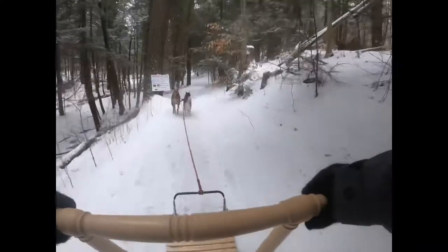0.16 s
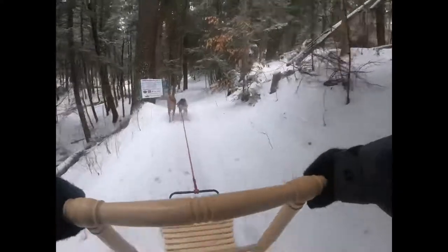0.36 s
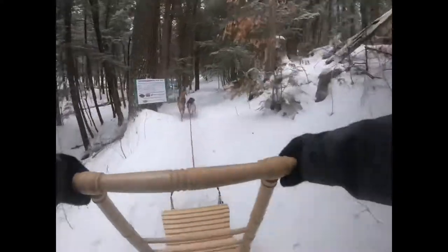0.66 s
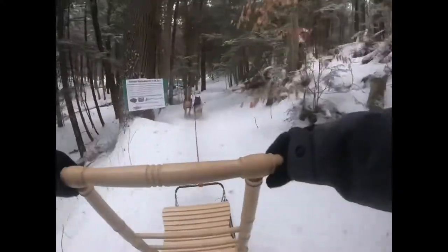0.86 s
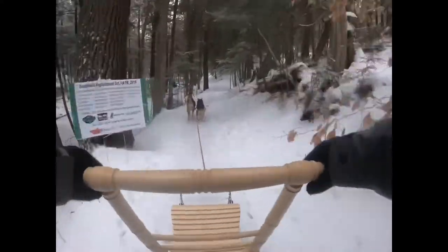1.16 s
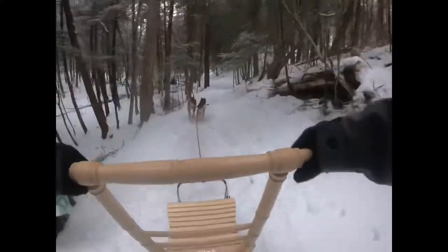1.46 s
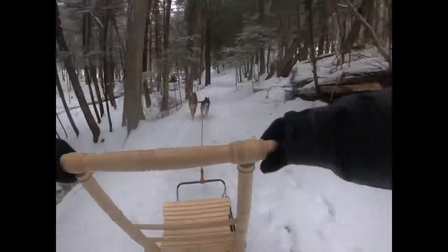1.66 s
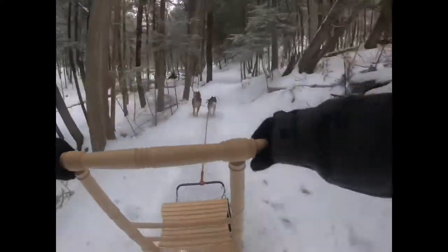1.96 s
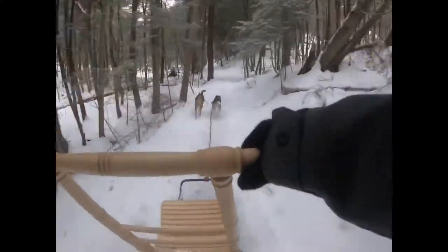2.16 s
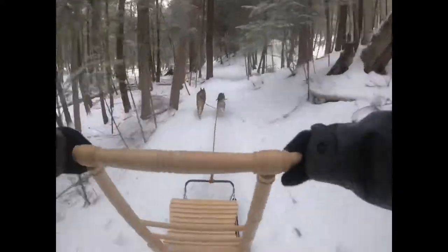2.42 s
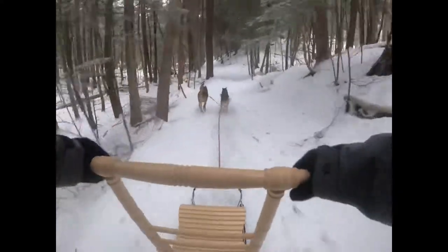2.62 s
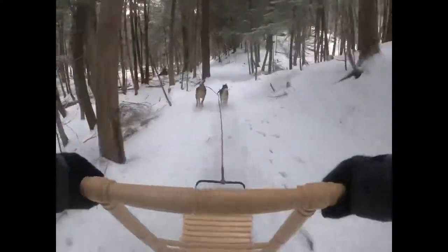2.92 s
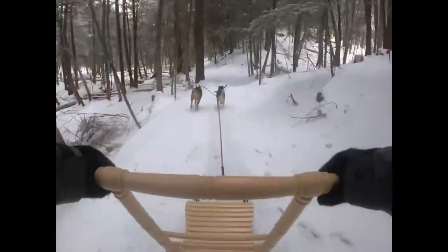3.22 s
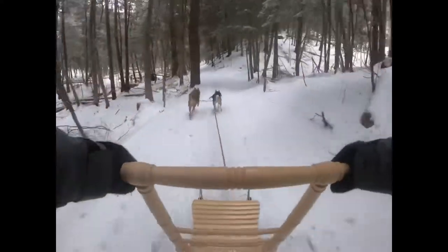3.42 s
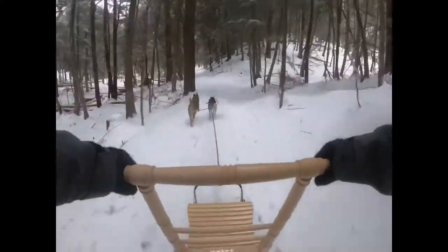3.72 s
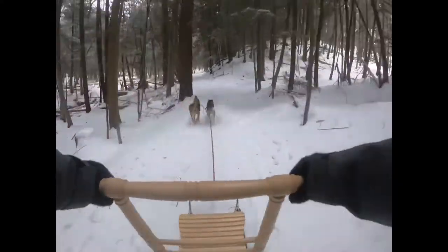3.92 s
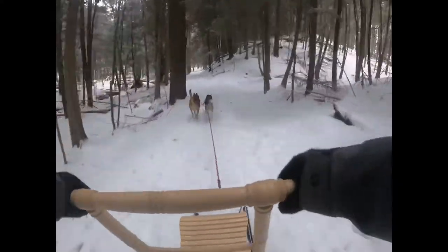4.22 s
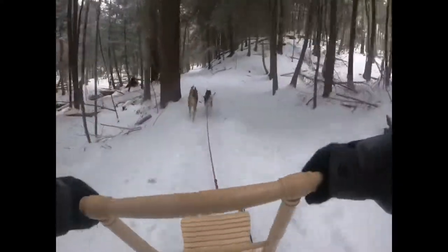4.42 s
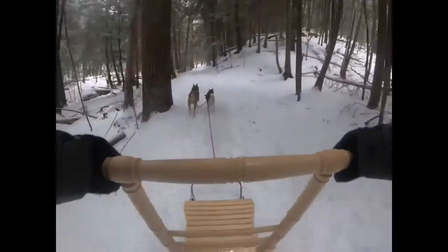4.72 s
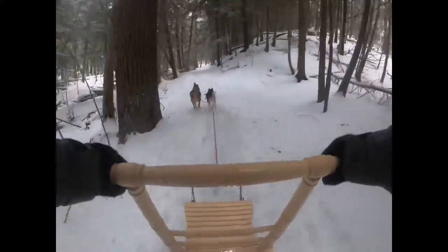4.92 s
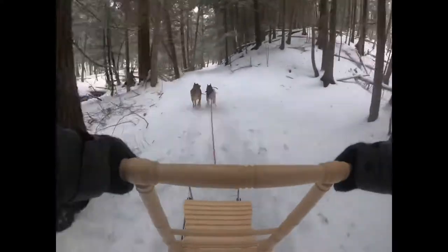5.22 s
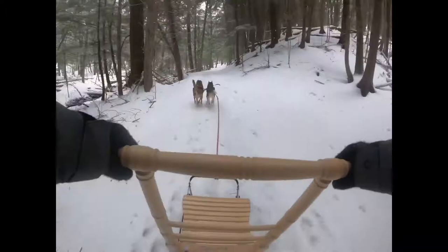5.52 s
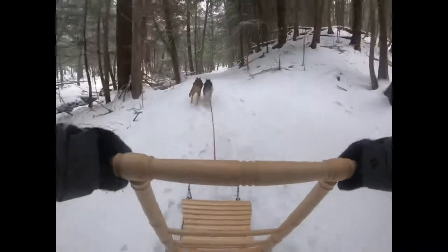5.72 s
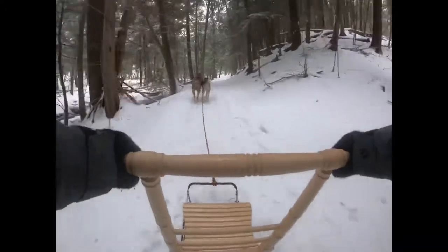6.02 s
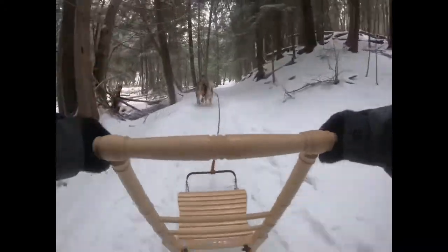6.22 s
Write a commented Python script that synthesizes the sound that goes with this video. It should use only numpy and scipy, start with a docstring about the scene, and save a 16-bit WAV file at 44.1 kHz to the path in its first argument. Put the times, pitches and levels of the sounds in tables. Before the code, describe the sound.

A wooden dog sled slides along a snowy forest trail, heard from a small covered camera on the driver's chest. Runners scrape steadily but unevenly, breaking crust into short, gritty, mid-pitched crunches with a thin hiss of ice grains. Faint frame drone and soft wind rumble sit below. Crunching thickens after two seconds and peaks near three; a sharp knock comes at about five, and more heavy crunches close it.

```python
"""Sled on crusty snow

Sled runners slide over crusty snow, heard by a small camera on the driver's chest.
Breaking snow grains, made from noise and clicks, scrape and crunch; they ring the camera housing's modes.
Filtered noise adds a fine hiss above, and below it the drone of the wooden frame and the rumble of wind.
Jolts are single low pulses; knocks are sharp clicks that ring the housing, each with a puff of noise."""
import sys
import numpy as np
from scipy import signal
from scipy.fft import rfft, irfft
from scipy.io import wavfile
from scipy.ndimage import uniform_filter1d

SR = 44100
rng = np.random.default_rng(int(sys.argv[2]) if len(sys.argv) > 2 else 0)


def master_out(mix):
    """Clip the mix to full scale and print it as 16-bit PCM to the path in sys.argv[1]."""
    frames = np.transpose(np.atleast_2d(mix))
    ceiling = np.clip(frames, -1, 1)
    pcm = np.round(ceiling * 32767).astype(np.int16)
    wavfile.write(sys.argv[1], SR, pcm)


N = 280917
HZ = np.fft.rfftfreq(N, 1 / SR)
TIME = np.arange(N) / SR

# All source levels below are relative: the layers are mixed with further gains.
# pressure of the runners on the crust: t/s, scrape level/dB, treble level/dB, scrape tilt/(dB per octave)
GLIDE = [(0, -35, -46.5, 8), (.2, -37, -52.5, 4.5), (.37, -36.5, -50, 6), (.45, -33, -47, 0),
         (.62, -37, -49, 4), (.74, -31, -44.5, 4), (.95, -41, -51.5, 7), (1.1, -29, -44, -1),
         (1.17, -41, -51, 3), (1.28, -29, -45, 6), (1.42, -37, -51, 2), (1.52, -39.5, -51, -1),
         (1.72, -33.5, -46.5, 1), (1.8, -40, -51, 5), (1.89, -31.5, -42.5, 2), (2.03, -31.5, -44.5, 4),
         (2.17, -35, -47.5, 3.5), (2.5, -32.5, -46.5, 1.5), (2.67, -30.5, -41.5, 8.5), (2.785, -30, -42, 5),
         (2.85, -26, -42.5, 0), (3.1, -33, -45.5, 3.5), (3.72, -38.5, -48, 0.5), (3.8, -34.5, -44.5, 3),
         (4.3, -38, -48.5, 3), (4.42, -33, -44.5, 9.5), (4.68, -36.5, -46, 0.5), (5.05, -33, -42.5, 4),
         (5.2, -27.5, -43.5, 1), (5.3, -31.5, -44, 2.5), (5.42, -31, -40.5, 5.5), (6.0, -31, -42, 3),
         (6.37, -34, -48, 1.5)]
# crust breaking under a runner: t/s, level/dB, length/ms, treble share/dB, colour f/Hz
CRUNCHES = [(0.068, -18, 14.5, -28, 2120), (0.111, -17.5, 19, -29.5, 2250), (0.134, -20, 17, -32, 2500),
            (0.15, -20.5, 16.4, -31, 2180), (0.221, -16.5, 10.4, -33, 2180), (0.42, -16, 9, -27, 2400),
            (0.4272, -5, 10.8, -31, 2540), (0.461, -17, 13, -28, 2450), (0.718, -16, 15, -29, 2480),
            (0.733, -22, 16, -38, 2500), (0.793, -21.5, 16, -28, 2430), (0.893, -24, 42, -28, 2500),
            (0.9325, -9.5, 21, -37, 2480), (1.007, -23.5, 30, -21.5, 2030), (1.182, -20, 24, -41, 2380),
            (1.194, -13.5, 16.7, -31.5, 2370), (1.289, -18.5, 17, -22, 2200), (1.337, -9, 7.5, -36, 2620),
            (1.344, -10, 8.7, -31, 2400), (1.39, -16, 14, -43, 1760), (1.416, -13.5, 10.3, -36, 2150),
            (1.529, -19, 13, -38, 2500), (1.595, -16, 8.6, -41, 2610), (1.8843, -14, 8, -23, 2290),
            (1.915, -18, 12, -23, 2440), (1.957, -10, 22, -27, 2200), (2.055, -21, 22, -32, 2400),
            (2.098, -10.5, 21.3, -37, 2340), (2.134, -1, 5.1, -40, 2400), (2.191, -23, 11, -31, 2900),
            (2.215, -17, 20, -35, 3050), (2.244, -15, 23, -31, 2980), (2.273, -13, 11, -29, 2830),
            (2.34, -20, 17, -40, 2750), (2.36, -19, 45, -26, 2800), (2.39, -22.5, 50, -23, 2520),
            (2.443, -19, 37, -24.5, 2850), (2.49, -14, 11, -37, 2820), (2.537, -12.5, 23.5, -26.5, 2600),
            (2.63, -18, 12.6, -29, 2700), (2.745, -8.5, 9.4, -39, 2360), (2.798, -7, 5, -26, 2300),
            (2.8032, -3.5, 9, -34.5, 2450), (2.823, -9, 17, -28, 2170), (2.881, -8, 15.4, -28.5, 2400),
            (2.8945, -5.5, 8.4, -37, 2410), (2.904, -9.5, 18, -40, 2450), (2.92, -16, 22, -34, 2400),
            (2.9473, -6, 10.5, -39, 2440), (3.027, -22, 8, -23, 2400), (3.116, -12, 10.8, -43, 2370),
            (3.1773, -6.5, 8.3, -36, 2570), (3.195, -11.5, 17, -42, 2420), (3.287, -18, 16, -31, 2700),
            (3.324, -14.5, 12, -28, 2470), (3.339, -14.5, 18.4, -35, 2550), (3.496, -23.5, 9.9, -27, 2260),
            (3.64, -15.5, 8.3, -30, 2420), (3.776, -14, 13, -24.5, 2400), (3.816, -17, 7.9, -37, 2400),
            (3.951, -12.5, 7.5, -25, 2130), (3.958, -1.5, 5.7, -43, 2440), (4.044, -8, 7.4, -37, 2480),
            (4.057, -11, 19.4, -32, 2620), (4.173, -15.5, 10.3, -44, 2180), (4.2416, -17.5, 15, -33, 2270),
            (4.383, -17.5, 23, -25.5, 2420), (4.463, -9.5, 29, -32.5, 2020), (4.52, -4, 9.8, -34, 2270),
            (4.542, -10.5, 10, -48, 2270), (4.577, -13, 14, -40, 2640), (4.597, -7.5, 10, -36, 2150),
            (4.719, -23.5, 30, -23, 2530), (4.812, -13, 7.6, -24, 1970), (4.906, -13.5, 9.1, -35, 2570),
            (4.979, -9.5, 8.1, -36, 2180), (5.091, -13.5, 32, -25.5, 2050), (5.141, -13, 22, -32, 2400),
            (5.176, -9, 11, -32, 2310), (5.199, -12.5, 21, -31, 2400), (5.227, -10.5, 18, -32, 2150),
            (5.307, -16.5, 13, -26, 2600), (5.343, -13, 32, -29.5, 2060), (5.4838, -11, 12.8, -29, 2270),
            (5.6686, -11, 26.5, -31.5, 2170), (5.788, -22, 11, -35, 2420), (5.892, -15, 31, -24, 2490),
            (5.958, -12, 26, -30.5, 2160), (5.995, -18, 5.3, -16, 2260), (6.023, -2.5, 7.2, -33, 2200),
            (6.059, -10, 8.4, -33, 1930), (6.073, -8, 8.8, -34, 2420), (6.089, -17, 19, -30, 2280),
            (6.115, -12, 44, -35, 1960), (6.1755, -17, 13, -29, 2340), (6.1868, -15, 25, -27.5, 1980),
            (6.264, -16, 28, -26, 1900), (6.281, -8, 25.5, -35, 2030), (6.302, -6.5, 10, -33.5, 2200),
            (6.326, -3, 5.4, -40, 2490), (6.349, -17.5, 11, -27.5, 2290), ]
# ringing modes of the camera housing, low, main and high: f/Hz, width/Hz, left level/dB, right level/dB
HOUSING_LOW = [(561, 63, -2.5, -5.5), (639, 620, -8.5, -12), (736, 140, 1.5, 2), (868, 72, 2.5, 3.5),
               (1005, 246, -3, 1), (1199, 96, -4, 5)]
HOUSING = [(1420, 180, -10, -8), (1667, 324, -0.5, 0), (1862, 150, -20, 2), (2245, 580, -3.5, -0.5),
           (2441, 650, -3.5, 1.5), (2744, 414, -9, 1.5), (3060, 650, -9.5, -9.5)]
HOUSING_HIGH = [(3980, 500, -4, -4), (4720, 620, 1.5, 3.5), (5480, 620, .5, .5), (6050, 550, -4.5, -4.5)]
# how far the right port (microphone opening) leads the left: f/Hz, lead/radians
PORT_LEAD = [(555, .6), (740, 2.1), (870, 2.6), (1020, 3.2), (1200, 1.8), (1450, -.1), (1860, -.1),
             (2200, -.2), (2460, .45), (2800, .3), (3250, -.6), (3900, -.8), (4600, -3.0), (5500, -2.5),
             (6050, -3.0)]
# spectrum of the hiss: f/Hz, level per Hz/dB
HISS = [(5200, -28), (6000, 0.5), (6500, 2), (8000, 4.5), (9500, 1.5), (12000, -4.5), (16000, -12)]
# hiss at the two ports: f/Hz, likeness (-1 to 1), left over right/dB
HISS_PORTS = [(6600, -.1, 0), (7700, -.35, -1), (8300, .1, -1), (9100, -.3, 2.5), (10000, -.1, 6),
              (12000, -.05, 1)]
# blows on the housing: t/s, level/dB, centre f/Hz, spread/octaves
KNOCKS = [(2.388, -37, 550, 0.12), (5.2488, -12.5, 1820, 0.98), (5.262, -18, 550, 0.15),
          (5.2628, -16.5, 4800, 1.57), (5.2649, -29, 2180, 1.2), (5.278, -28, 2600, 0.97),
          (5.355, -32.5, 805, 0.74), (6.121, -26, 1100, 0.56)]
# bumps heard as one low pulse: t/s, level/dB, f/Hz
JOLTS = [(.5, -37, 40), (.545, -35, 140), (0.568, -28.5, 55), (0.59, -32, 90), (2.538, -32, 110),
         (2.559, -29.5, 39.7), (2.584, -37, 45), (3.76, -39, 130), (3.893, -35, 60), (3.968, -33, 30),
         (4.051, -44, 144), (5.1183, -20, 141), (5.131, -26.5, 126), (5.253, -29.5, 149), (.445, -36, 149),
         (0.69, -38, 129), (1.418, -34.5, 171)]
# shaking of the sled and headwind: t/s, frame drone level/dB, wind level/dB
BASS = [(0, -57, -39), (.35, -57, -48.5), (.55, -51, -45), (.78, -59.5, -54), (1.18, -63, -52),
        (1.3, -50, -43.5), (1.47, -56, -45), (1.55, -63, -60), (1.68, -54, -47), (1.79, -60.5, -60),
        (1.88, -50.5, -49.5), (2.17, -62.5, -48), (2.55, -51.5, -48), (2.68, -60.5, -47), (3.15, -56, -53),
        (3.57, -66.5, -65), (3.8, -53, -46), (3.95, -56.5, -45), (4.12, -59.5, -46.5), (4.24, -50.5, -41),
        (4.33, -64, -50.5), (4.55, -56, -45), (5.03, -63, -56), (5.12, -53, -44.5), (5.22, -58.5, -44),
        (5.27, -54.5, -50), (5.45, -55.5, -45.5), (5.92, -59, -56), (6.13, -56, -44.5), (6.37, -53, -36)]
# resonances of the wooden frame: f/Hz, width/Hz, level/dB
FRAME = [(163.2, 72, 1), (216, 200, -4), (338, 160, -15)]
# spectrum of the wind: f/Hz, level per Hz/dB
WIND = [(8, -15), (15, 1.5), (30, -9), (50, -17), (70, -21.5), (110, -34.5), (200, -30.5)]
# response of the covered microphones: f/Hz, level/dB
MICROPHONE = [(10, 0.5), (9800, -1), (10500, -7), (11200, -20), (14000, -11), (16000, -23)]

# the low modes follow frame shaking and scrape (dB per dB), around a middle level in dB
LOW_PER_SHAKE, LOW_PER_SCRAPE, LOW_DB = 0.83, 0.066, -53.5
# the tick of a blow: dB over the blow, colour in Hz, decay in ms
TICK_DB, TICK_HZ, TICK_MS = -7, 6000, 2.0
TILT_PIVOT_HZ = 2300  # the scrape tilt leaves this frequency unchanged
EDGE_HZ = 15100  # upper band limit


def runners(bumps):
    """Scrape and crunches ring the housing; lumps in the crust vary the force, most gently in the dust."""
    lumps = wobble(0.043)
    *bursts, burst_treble = crunches()
    snap = cracks(gap_ms=1.6, spread_db=4.5)
    level_db, treble_db, shake_db = curve(GLIDE, 1), curve(GLIDE, 2), curve(BASS, 1)

    force = gain(level_db + 1.2 * lumps + 1.7 * wobble(0.006))
    snaps = snap * np.hypot(gain(-3.5) * np.array(bursts), gain(-9.5) * force)
    tilt_db = curve(GLIDE, 3) + 3.0 * wobble(0.012)
    main = housing(HOUSING, force, snaps, apart=0.26, patchy_db=1.77, spread_db=0.5,
                   drift_db=1.43, tilt_db=tilt_db)

    low_db = LOW_DB + LOW_PER_SHAKE * (shake_db - shake_db.mean())
    low_db += LOW_PER_SCRAPE * (level_db - level_db.mean())
    low_force = gain(low_db + 1.8 * lumps + 2.0 * bumps)
    low_snaps = np.tile(gain(-26.5) * snap * bursts[0], (len(HOUSING_LOW), 1))
    low = housing(HOUSING_LOW, low_force, low_snaps, apart=0.29, patchy_db=4.5, spread_db=-1.5)

    high_scrape = gain(treble_db + 1.3 * lumps + 1.3 * wobble(0.025))
    high_force = np.hypot(high_scrape, gain(8.0) * burst_treble)
    high_snaps = np.tile(gain(6.5) * snap * burst_treble, (len(HOUSING_HIGH), 1))
    high = housing(HOUSING_HIGH, high_force, high_snaps, apart=0.52, patchy_db=3.0, spread_db=-1.0)

    dust = gain(treble_db + 0.5 * lumps + 1.0 * wobble(0.03))
    fine = np.hypot(dust, gain(3.5) * burst_treble)
    body = gain(-2.0) * main + gain(4.5) * low + gain(1.5) * high
    return body + gain(-1.0) * hiss(fine)


def crunches(rise_ms=3.6, early_ms=4.1, octaves=0.41, treble_lag=0.44):
    """Force of the breaking crust, rising and dying away: one row per main mode, then the treble."""
    power = np.zeros((len(HOUSING) + 1, N))
    ms = np.arange(SR // 8) / SR * 1000
    for s, db, length_ms, treble_db, hz in CRUNCHES:
        rise = 1 - np.exp(-(ms / rise_ms) ** 2)
        fall = np.exp(-(ms / np.clip(length_ms, 3, 50)) ** 2.09)
        colour = [reach(row[0], hz, octaves) for row in HOUSING] + [gain(treble_db)]
        burst = np.outer(colour, gain(db) * rise * fall)
        burst[-1] *= 1 - np.exp(-(ms / (treble_lag * length_ms)) ** 2)  # the treble rises later
        # the force starts building a moment before the listed time
        start = round((s - early_ms / 1000) * SR)
        part = power[:, start:][:, :len(ms)]
        part += burst[:, :part.shape[1]] ** 2
    return np.sqrt(power)


def cracks(gap_ms, spread_db):
    """Separate snaps of crust, one at a random place in every gap, of mean power 1."""
    gap = max(round(gap_ms * SR / 1000), 8)
    where, size, sense = rng.random((N, 3))[::gap].T
    place = np.arange(len(where)) * gap + (where * gap).astype(int)
    clicks = np.zeros(N + gap)
    clicks[place] = gain(spread_db * (2 * size - 1)) * np.sign(sense - 0.5)
    return evened(clicks[:N])


def grains(force, spread_db):
    """Dense snow fractures: noise of uneven size, scaled by the force."""
    return force * evened(rng.standard_normal(N) * gain(spread_db * wobble(0.00022)))


def housing(modes, force, snaps, apart, patchy_db, spread_db, tilt_db=0, drift_db=0):
    """Housing modes rung by their own scrape, their snaps, and a stray part of opposite sign at the ports."""
    out, power = np.zeros((2, len(HZ)), complex), 0
    stray_force = np.hypot(force, abs(snaps).mean(0))
    stray = rfft(grains(stray_force, spread_db)) * apart * np.array([[1], [-1]])
    for k, (row, snap) in enumerate(zip(modes, snaps)):
        response = ports(*row)
        uneven_db = patchy_db * wobble(0.013) + drift_db * wobble(0.051)
        scrape = grains(force * gain(uneven_db), spread_db)
        # snaps push neighbouring modes in opposite sense
        drive = scrape + (-1) ** k * snap * gain(3.0 * wobble(0.0054))
        tilt = gain(tilt_db * np.log2(row[0] / TILT_PIVOT_HZ))
        out += response * (rfft(drive * tilt) + stray)
        power += np.mean(abs(response) ** 2)
    return irfft(out, N) / np.sqrt(power)


def ports(hz, width, left_db, right_db):
    """One housing mode at the left and right port, with its own level and phase at each."""
    lead = np.interp(hz, *np.transpose(PORT_LEAD))
    sides = np.array([[gain(left_db)], [gain(right_db) * np.exp(1j * lead)]])
    return sides * mode(hz, width)


def mode(hz, width):
    """Response of a damped resonance with steep skirts, of size 1 at its peak."""
    # squaring steepens the skirts and narrows the peak
    return (HZ * width / (hz ** 2 - HZ ** 2 + 1j * HZ * width)) ** 2


def reach(hz, centre_hz, octaves):
    """How strongly a blow of one colour drives a frequency: a bell curve in octaves."""
    return np.exp(-0.5 * (np.log2(hz / centre_hz) / max(octaves, 0.05)) ** 2)


def hiss(force):
    """Fine airborne crystals: filtered grain noise, mostly different at the two ports."""
    f, like, tilt_db = np.transpose(HISS_PORTS)
    like = np.clip(np.interp(HZ, f, like), -1, 1)
    tilt = gain(np.interp(HZ, f, tilt_db) / 2)
    a, b = (rfft(force * shaped(grains(1, spread_db=2.5), HISS)) for port in range(2))
    left = tilt * a
    right = (like * a + np.sqrt(1 - like ** 2) * b) / tilt
    return irfft([left, right], N)


def knocks():
    """Single sharp blows ring the housing modes near their colour, with a bright tick on top."""
    out = np.zeros((2, len(HZ)), complex)
    for k, row in enumerate(HOUSING_LOW + HOUSING + HOUSING_HIGH):
        blows = np.zeros(N)
        for s, db, hz, octaves in KNOCKS:
            # undo the mode's right-hand level and its dependence on width
            strength = gain(db - row[3]) * SR / (4 * row[1])
            blows[round(s * SR)] = strength * reach(row[0], hz, octaves)
        out += (-1) ** k * ports(*row) * rfft(blows)  # neighbouring modes swing in opposite sense
    return irfft(out, N) + ticks()


def ticks():
    """The bright edge of each blow through the air: a very short, fading puff of noise."""
    out, ms = np.zeros((2, N)), np.arange(400) / SR * 1000
    for s, db, hz, octaves in KNOCKS:
        noise = np.diff(rng.standard_normal(len(ms) + 1))
        puff = evened(uniform_filter1d(noise, size=4)) * np.exp(-ms / TICK_MS)
        level = gain(db + TICK_DB) * reach(TICK_HZ, hz, octaves)
        out[:, round(s * SR):][:, :len(ms)] += level * puff
    return out


def jolts():
    """Low pressure dips with a small overshoot on both sides, nearly alike at both ports."""
    out = np.zeros(N)
    for s, db, hz in JOLTS:
        near = slice(round((s - 0.05) * SR), round((s + 0.05) * SR))
        u = (np.pi * hz * (TIME[near] - s)) ** 2
        out[near] -= gain(db) * (1 - 2 * u) * np.exp(-u)
    return out * gain([[-0.4], [0.4]])  # slightly stronger at the right


def frame(bumps):
    """The wooden frame drones: noise through its resonances, nearly alike at both ports."""
    wood = sum(gain(db) * mode(hz, width) for hz, width, db in FRAME)
    a, b = (evened(irfft(rfft(rng.standard_normal(N)) * wood, N)) for port in range(2))
    level = gain(curve(BASS, 1) + 2.95 * bumps + 1.96 * wobble(0.014))
    return level * np.array([gain(2.0) * a + 0.36 * b, gain(3.0) * a - 0.067 * b])


def wind(bumps):
    """Lumpy low rumble of the headwind: filtered noise, mostly shared by the ports."""
    a, b = (shaped(rng.standard_normal(N), WIND) for port in range(2))
    level = gain(curve(BASS, 2) + 3.0 * bumps + 1.2 * wobble(0.018))
    return level * np.array([gain(0.7) * a + 0.3 * b, gain(1.5) * a - 0.15 * b])


def gain(db):
    """Decibels to a plain multiplier."""
    return 10 ** (np.asarray(db) / 20)


def evened(x):
    """Scales to rms 1."""
    return x / np.sqrt(np.mean(x ** 2) + 1e-20)


def curve(rows, column):
    """One column of a table, drawn as straight lines along time."""
    rows = np.asarray(rows)
    return np.interp(TIME, rows[:, 0], rows[:, column])


def shaped(x, points):
    """Filters by a spectrum given in dB, to rms 1."""
    f, db = np.transpose(points)
    spectrum_db = np.interp(np.log(HZ + 1), np.log(f), db, -120, -120)
    return evened(irfft(rfft(x) * gain(spectrum_db), N))


def wobble(seconds):
    """Random drift of rms 1: noise averaged twice over the given time."""
    size = max(int(seconds * SR), 2)
    return evened(uniform_filter1d(uniform_filter1d(rng.standard_normal(N), size), size))


def scene():
    """All sources at the two ports; the same trail bumps shake the frame, the low modes and the wind."""
    bumps = 1.5 * np.tanh(wobble(0.041) / 1.5)  # softly limited
    return runners(bumps) + knocks() + jolts() + frame(bumps) + wind(bumps)


def record(dry):
    """The covered microphones dull the treble; then a low-pass filter sets the band limit."""
    f, db = np.transpose(MICROPHONE)
    cover = gain(np.interp(np.log(HZ + 1), np.log(f), db))
    dull = irfft(rfft(dry) * cover, N)
    low_pass = signal.firwin(511, EDGE_HZ, window=("kaiser", 9), fs=SR)
    return signal.oaconvolve(dull, low_pass[None], "same")


dry = scene()
out = record(dry)
master_out(out)
```